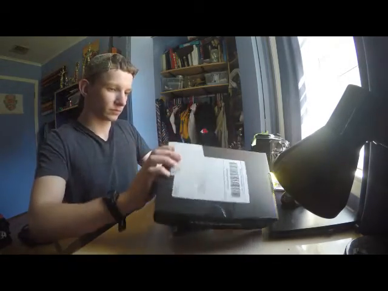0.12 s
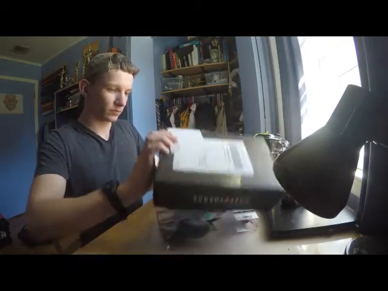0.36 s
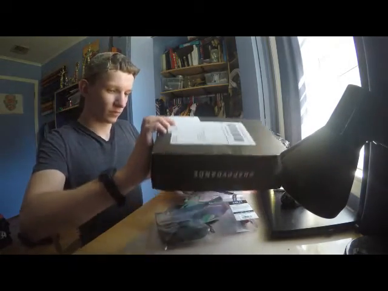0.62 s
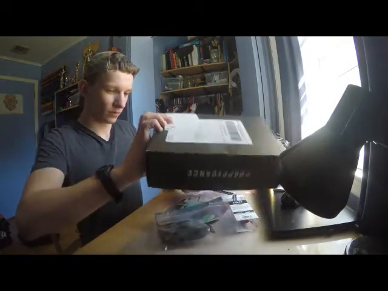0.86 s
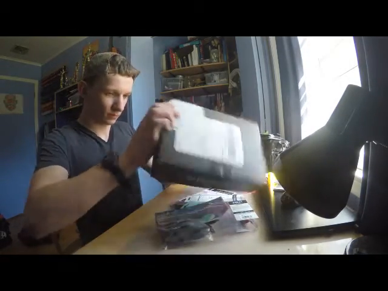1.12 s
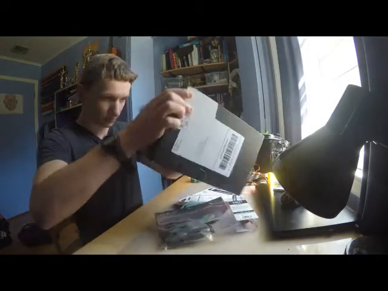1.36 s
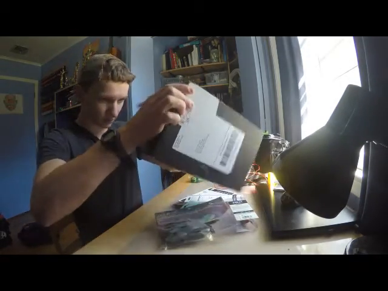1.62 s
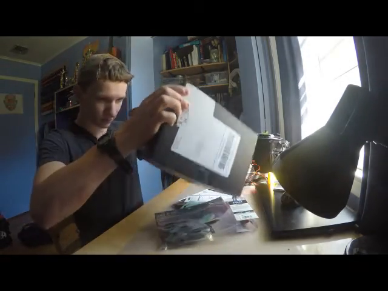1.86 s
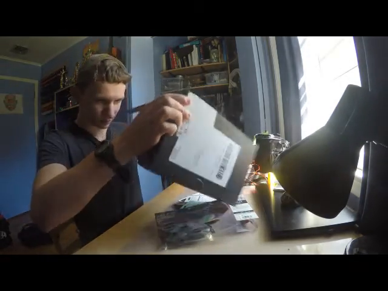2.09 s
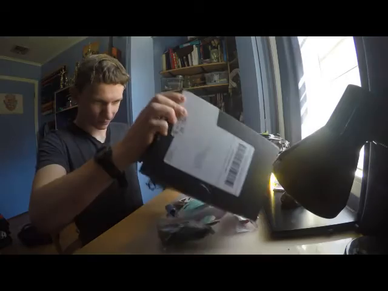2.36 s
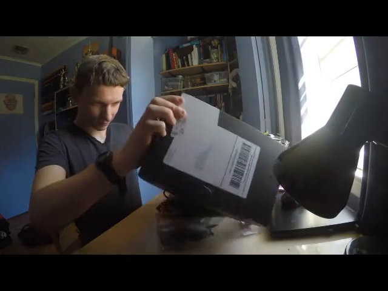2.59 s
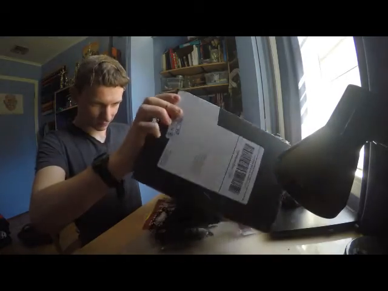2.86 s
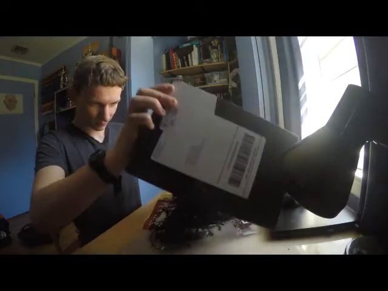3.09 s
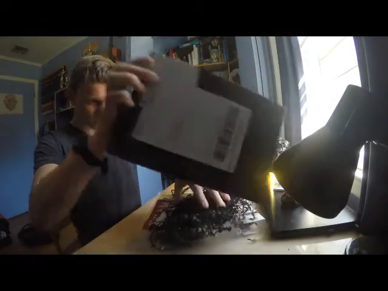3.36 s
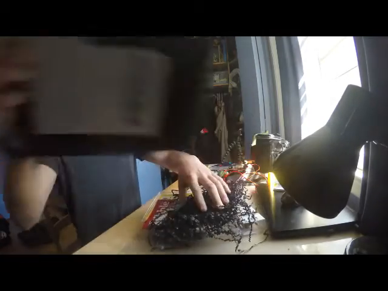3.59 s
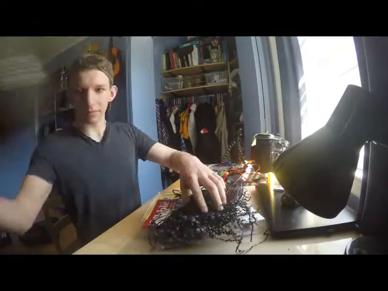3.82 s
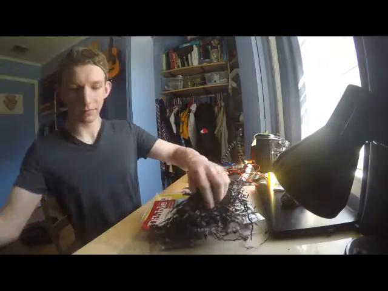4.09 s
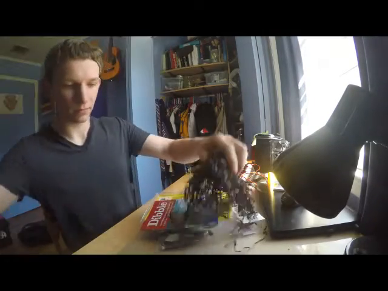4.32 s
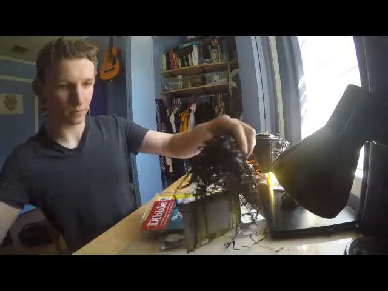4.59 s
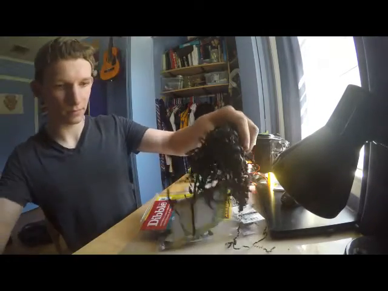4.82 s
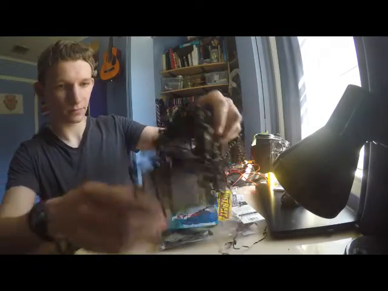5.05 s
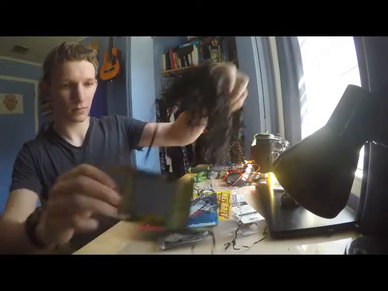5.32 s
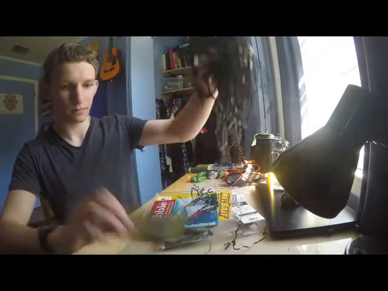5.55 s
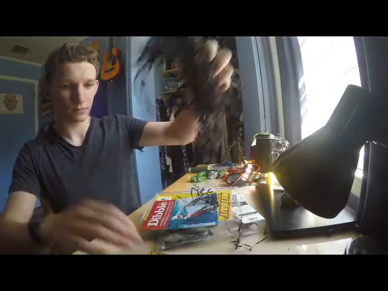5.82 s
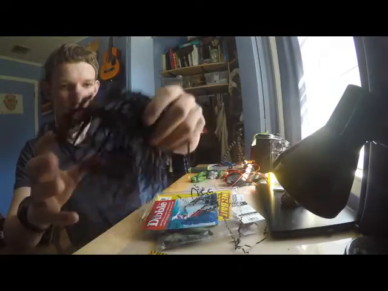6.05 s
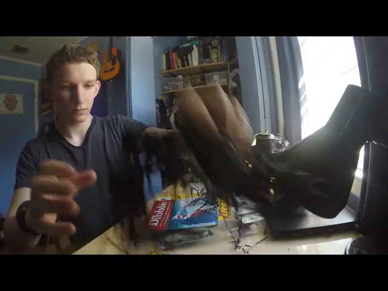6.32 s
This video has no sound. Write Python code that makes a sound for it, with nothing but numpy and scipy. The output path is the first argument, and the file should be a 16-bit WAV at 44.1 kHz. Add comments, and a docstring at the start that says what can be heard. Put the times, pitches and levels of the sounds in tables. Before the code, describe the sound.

Close, boomy desk sounds picked up through the wood: a cluster of knocks with crinkling packets, one isolated knock, small ticks and rubbing, then another strong thump as more contents drop. Shredded paper rustles softly and things go nearly quiet. A tossed empty cardboard box cracks sharply onto the floor and bounces with a hollow clatter. A few deep thuds and short skids on the desk follow, over faint hiss.

```python
"""Packets knock on a wooden desk top that booms and rings, card and shredded paper slide and rustle
between the knocks, and an empty box lands on the floor a few steps away and bounces.
A cardboard box is being tipped out; the microphone is in a small camera standing on the desk. The desk is
a set of dying sines, struck for blows and fed with noise or clicks for pushes and friction. The landing
rings box and floor and crackles card. A short room tail, the camera case and faint hiss lie over it all."""
import sys
import numpy as np
from scipy import signal
from scipy.fft import rfft, irfft
from scipy.io import wavfile
from scipy.ndimage import uniform_filter1d

SR = 44100
rng = np.random.default_rng(int(sys.argv[2]) if len(sys.argv) > 2 else 0)


def magnitude_from_level(level_db):
    """Linear magnitude for a level in decibels (20 dB per decade)."""
    exponent = np.asarray(level_db, float) / 20
    return 10 ** exponent


def output_pcm(signal):
    """Save a mono or channel-first signal as 16-bit PCM at the path in sys.argv[1].

    Samples are clipped to [-1, 1] before scaling.
    """
    pcm = np.clip(np.atleast_2d(signal).T, -1, 1) * 32767
    wavfile.write(sys.argv[1], SR, np.round(pcm).astype(np.int16))


N = 283563  # length of the scene in samples


def evened(x):
    """Scales to rms 1."""
    return x / np.sqrt(np.mean(x ** 2) + 1e-20)


def loudest(x):
    """Scales so that the loudest 10 ms have rms 1."""
    power = uniform_filter1d(x ** 2, SR // 100)
    return x / np.sqrt(power.max() + 1e-20)


def peaked(x):
    """Scales to a peak of 1."""
    return x / (abs(x).max() + 1e-20)


def add(mix, start_s, sound):
    """Lays a sound into the mix at start_s seconds."""
    part = mix[round(start_s * SR):][:len(sound)]
    part += sound[:len(part)]


def coloured(x, points):
    """Filters x by a spectrum of (Hz, dB) points."""
    hz, db = np.transpose(points)
    bins_hz = np.fft.rfftfreq(len(x), 1 / SR)
    gain = magnitude_from_level(np.interp(np.log(bins_hz + 1), np.log(hz), db))
    return irfft(rfft(x) * gain, len(x))


def swell(count, rise_s):
    """The smooth start of a blow; rise_s is its time constant."""
    return (1 - np.exp(-np.arange(count) / SR / rise_s)) ** 2


def ring(modes, seconds, spread_db=0.):
    """Dying sines of neighbouring modes, which start in opposite directions."""
    t = np.arange(round(seconds * SR)) / SR
    hz, db, t60 = np.transpose(modes)[:, :, None]
    luck = rng.standard_normal((len(modes), 1))
    sign = (-1.) ** np.arange(len(modes))[:, None]
    decay = magnitude_from_level(db + spread_db * luck - 60 * t / t60)
    return (sign * decay * np.sin(2 * np.pi * hz * t)).sum(0)


def crackle(count, per_s, spread_db):
    """Clicks of random sign in bunches over count samples; a few are large."""
    draw = rng.random((3, count))
    bunches = magnitude_from_level(2. * evened(uniform_filter1d(rng.standard_normal(count), 400)))
    size_db = -spread_db * np.log(np.maximum(draw[0], .02))
    sign = np.sign(draw[1] - .5)
    happens = draw[2] < per_s / SR
    return bunches * magnitude_from_level(size_db) * sign * happens


# modes of the desk top and the camera standing on it: pitch_hz, level_db, t60_s
DESK_MODES = [(45.4, -7.5, .2), (64, 7.5, 0.23), (77, -1.5, 0.35), (93.2, 0.5, 0.46), (120.1, -3.5, 0.2),
              (157.4, 1.5, 0.14), (203.5, -6, 0.27), (248.5, -6, 0.13), (298, -8, 0.097), (342, -5, 0.13),
              (484.9, -4.5, 0.11), (620.5, -3, 0.039), (702.2, 0.5, .05), (750.5, 1.5, 0.033),
              (830.5, -8, 0.04), (988, -13, 0.033), (1147, -2, 0.022), (1339, -4.5, 0.023),
              (1622, -1.5, 0.018), (1828, 3, 0.029), (2127, 3.5, 0.022), (2330, -7.5, 0.034),
              (2536, -5.5, 0.017), (2740, -8.5, 0.029), (3150, -7, 0.0091), (3421, 2.5, .025),
              (3393, 2.5, 0.014), (4076, -3, 0.0083), (3927, 3, 0.014)]
# registers of the desk by name: low_hz, high_hz
REGISTERS = {"deep": (0, 72), "boom": (72, 135), "thud": (135, 530), "knock": (530, 1050),
             "clack": (1050, 2600), "snap": (2600, 5000)}


def desk_ring(register, spread_db=0.):
    """The desk modes of one register after a sharp tap."""
    low_hz, high_hz = REGISTERS[register]
    modes = [mode for mode in DESK_MODES if low_hz < mode[0] < high_hz]
    longest_s = max(t60 for *_, t60 in modes)
    return ring(modes, 1.5 * longest_s, spread_db)


# tick of hard contact: pitch_hz, level_db (per Hz)
TICK = [(1650, -41), (2800, -5.5), (4130, -13), (5180, -18.5), (7330, -18), (9700, -35.5), (10600, -26.5),
        (12000, -45.5), (15600, -74.5), (22000, -120)]
# hard knocks on the desk: start_s, snap_db, boom_db, knock_db, clack_db
KNOCKS = [(0.0243, -37.5, -27, -23, -35.5), (0.0617, -50, -33, -26, -34), (0.1656, -48, -56, -44, -70),
          (0.2403, -42.5, -20.5, -9.5, -21.5), (0.2709, -33, -22, -19.5, -24.5),
          (0.304, -46, -47.5, -43, -39), (0.3124, -40, -35, -49, -42), (0.406, -45, -35, -43.5, -48.5),
          (0.443, -39, -41.5, -54, -54), (0.5415, -47, -47, -59, -62.5), (0.6305, -52, -53.5, -67, -60),
          (0.815, -31.5, -27.5, -9.5, -20), (0.9358, -57.5, -41.5, -68, -65),
          (0.95, -50, -51.5, -56.5, -53.5), (1.0945, -45, -65, -64.5, -57.5),
          (1.261, -49.5, -53.5, -73, -59), (1.3659, -51, -54.5, -55, -55.5),
          (1.617, -45, -56.5, -57, -46.5), (1.7628, -53, -66.5, -71.5, -58.5),
          (1.8193, -48, -62, -67, -61.5), (2.261, -24, -11.5, -6.5, -23), (2.3182, -55.5, -26.5, -35, -53),
          (2.3316, -41, -34.5, -55, -67), (2.5659, -47, -28.5, -25.5, -40.5), (2.6428, -46, -40, -49, -67),
          (2.728, -48, -56.5, -75, -68), (2.858, -49, -57.5, -66, -68), (3.0875, -46.5, -35.5, -68, -55),
          (3.109, -54, -31.5, -57.5, -49), (3.8744, -52, -62, -61, -79), (4.1982, -60, -50.5, -55.5, -61),
          (4.2694, -66, -51.5, -66, -75.5), (5.1256, -44, -51, -70.5, -58),
          (5.2031, -48, -59.5, -78.5, -72.5), (5.391, -41, -32, -38, -34.5), (5.657, -27.5, -21, -35, -63),
          (5.7454, -51.5, -24, -26, -30.5), (6.264, -56, -66, -67, -51.5)]


def knock(snap_db, boom_db, knock_db, clack_db):
    """A blow ticks and rings the desk from boom to snap; low modes take longer to build up."""
    out = np.zeros(SR)
    count = SR // 8
    tick = coloured(rng.standard_normal(count), TICK)
    snap = tick * magnitude_from_level(-60 * np.arange(count) / SR / 0.067)  # t60 67 ms
    add(snap, 0, 1.3 * abs(snap).max() * peaked(desk_ring("snap", 4))[:count])
    add(out, 0, magnitude_from_level(snap_db) * peaked(snap * swell(count, 0.000993)))
    thud_db = boom_db - 9
    layers = (("boom", boom_db, .005), ("thud", thud_db, .003),
              ("knock", knock_db, .0012), ("clack", clack_db, .001))
    for register, level_db, rise_s in layers:
        modes = desk_ring(register, spread_db=2.5)
        struck = modes[:SR] * swell(len(modes), rise_s)[:SR]
        add(out, 0, magnitude_from_level(level_db) * loudest(struck))
    return out


# paper heard directly: pitch_hz, level_db (per Hz)
PAPER = [(530, -32), (900, -2), (2120, -5), (3000, 0), (3970, -3.5), (5270, -15.5), (7950, -16.5),
         (12000, -33.5), (15600, -65), (22000, -120)]


def rubbed(clicks, register, airborne, spread_db=0.):
    """Friction clicks ring one register of the desk; a share is heard directly as paper."""
    wood = signal.oaconvolve(clicks, desk_ring(register, spread_db))[:len(clicks)]
    return loudest(wood) + airborne * loudest(coloured(clicks, PAPER))


# soft packets flop and skid on the desk: start_s, crinkle_db, clack_db, knock_db, contact_s
SKIDS = [(.012, -52.5, -58, -42, 0.076), (.27, -46.5, -45, -35, 0.085), (.455, -57.5, -55.5, -52.5, 0.048),
         (.63, -67.5, -62.5, -67, 0.044), (.735, -65, -58, -69, .035), (.95, -57.5, -59, -61, 0.12),
         (1.144, -53.5, -52, -47.5, 0.085), (1.35, -62.5, -62.5, -67.5, 0.12),
         (1.617, -48, -53.5, -52, 0.055), (2.008, -55.5, -55, -61, .14), (2.455, -61, -51, -64, 0.28),
         (2.575, -51.5, -57.5, -43.5, 0.11), (2.75, -64.5, -73.5, -57, 0.084),
         (3.087, -65, -48.5, -49, 0.037), (3.235, -76, -71.5, -60, .04), (3.42, -70.5, -86, -87, 0.13),
         (3.8, -66, -76.5, -73, .07), (3.876, -66.5, -78.5, -61, 0.074), (4.196, -71, -67, -58, 0.035),
         (4.27, -78.5, -70, -67.5, 0.077), (5.12, -62, -72, -83, 0.18), (5.366, -70, -48.5, -38, 0.019),
         (5.385, -49, -39, -40, 0.075), (5.483, -65, -47.5, -43, 0.1), (5.65, -62, -35, -29.5, 0.02),
         (5.708, -53, -39.5, -34, 0.034), (5.742, -53, -34.5, -29.5, 0.037),
         (5.785, -59, -47.5, -45.5, 0.045), (5.85, -75, -67, -54, 0.059)]


def skid(crinkle_db, clack_db, knock_db, contact_s):
    """Contact starts at once, holds, and fades; meanwhile dense clicks feed the desk."""
    t = np.arange(round(.45 * SR)) / SR - .01  # contact begins 10 ms in
    onset = np.clip(t / 0.0022, 0, 1)
    release = 1 + (np.maximum(t, 0) / contact_s) ** 7.7  # the power sets how abruptly contact ends
    grip = onset * np.exp(-.8 * t / contact_s) / release
    thud_db = (clack_db + knock_db) / 2 + 0.5
    layers = ((crinkle_db, "snap", 1.4), (clack_db, "clack", .5),
              (knock_db, "knock", .1), (thud_db, "thud", .01))
    out = np.zeros(len(t))
    for level_db, register, airborne in layers:
        clicks = grip * crackle(len(t), 1800, 4.)
        out += magnitude_from_level(level_db) * rubbed(clicks, register, airborne, 2)
    return out


# a hand or the box leans on the desk: start_s, thud_db, boom_db, deep_db
SHOVES = [(0.466, -49, -25, -47), (0.696, -68, -45.5, -59), (0.944, -54, -41, -48),
          (1.054, -52, -32.5, -56), (1.15, -43.5, -45, -61), (1.205, -45, -42.5, -59),
          (1.621, -58, -39.5, -51.5), (2.018, -60.5, -56, -58.5), (2.34, -43, -22, -41),
          (2.43, -54, -32, -54), (2.608, -43, -26, -34), (2.752, -58, -32.5, -62),
          (2.84, -63.5, -43, -58.5), (3.092, -46, -47.5, -32.5), (3.218, -56, -33.5, -40),
          (3.413, -78.5, -62, -44), (4.291, -66.5, -49.5, -58), (4.37, -72, -44, -60),
          (5.397, -38.5, -25, -46), (5.5, -53, -44, -43.5), (5.667, -34.5, -15.5, -22.5),
          (5.81, -40.5, -23.5, -53), (6.064, -70, -45.5, -63)]


def shove(thud_db, boom_db, deep_db):
    """A slow push reaches only the low modes."""
    out = np.zeros(SR)
    layers = (("thud", loudest, thud_db), ("boom", peaked, boom_db), ("deep", loudest, deep_db))
    for register, scaled, level_db in layers:
        modes = desk_ring(register, 2.4)[:SR]
        add(out, 0, magnitude_from_level(level_db) * scaled(modes * swell(len(modes), 0.0046)))
    return out


# hands, card and paper on the move: time_s, rustle_db, scrape_db, push_db (on the desk)
HANDLING = [(0.0, -59, -38, -24), (0.29, -55.5, -62, -53), (0.59, -69, -72, -61), (1.11, -64, -68.5, -50),
            (1.41, -64, -71.5, -59.5), (2.02, -60, -68.5, -66), (2.26, -60.5, -74, -62),
            (2.42, -59.5, -60.5, -50), (2.52, -54.5, -58, -40), (2.9, -72, -69.5, -58),
            (3.26, -74, -72, -52.5), (3.58, -74, -79, -70), (3.96, -66.5, -73, -70),
            (4.23, -71.5, -76, -70.5), (4.57, -68, -76, -43), (4.75, -74, -77.5, -51.5),
            (5.41, -68, -71.5, -66), (5.57, -58.5, -53.5, -55), (5.68, -62, -61.5, -52),
            (5.86, -74, -66.5, -37.5), (6.0, -77.5, -77.5, -56.5), (6.43, -72, -78, -68.5)]


def handling():
    """Paper crackles and rubs on the desk; uneven pushes keep the low modes alive."""
    time_s, *columns = np.transpose(HANDLING)
    t = np.arange(N) / SR
    rustle, scrape, push = (magnitude_from_level(np.interp(t, time_s, level_db)) for level_db in columns)
    rub = magnitude_from_level(-4.5) * np.sqrt(rustle * scrape)  # derived from both levels
    pushes = rng.standard_normal(N)
    boom, thud = (evened(signal.oaconvolve(pushes, desk_ring(register))[:N])
                  for register in ("boom", "thud"))
    out = push * (boom + 0.11 * thud)
    # hands move in fits: 2.5 dB of unevenness, smoothed over 81 ms
    drift = signal.oaconvolve(rng.standard_normal(N), np.hanning(round(0.081 * SR)), "same")
    fits = magnitude_from_level(2.5 * evened(drift))
    for level, register, airborne in ((rustle, "snap", 1.3), (rub, "clack", .5), (scrape, "knock", .1)):
        friction = rubbed(crackle(N, 2700, 2.9), register, airborne)
        out += level * evened(fits * friction)
    return out


# modes heard when the box lands: the shaken floor and desk at 40 Hz, five hollow box modes,
# then its panels: pitch_hz, level_db, t60_s
LANDING_MODES = [(40, -16, 0.35), (70.9, -11, 0.59), (147.7, 7, 0.23), (242.3, -9, 0.21), (658, -19, 0.14),
                 (741, -11.5, 0.08), (255, -11, 0.14), (289, -15.5, 0.32), (1022, -5.5, 0.057),
                 (1436, 10, 0.016), (1810, -7, 0.021), (2430, 4.5, 0.022)]
# crunch of creasing card: pitch_hz, level_db (per Hz)
CRUNCH = [(240, -33), (400, -9), (542, -7), (663, -24), (735, -10.5), (1400, -10.5), (2000, -17),
          (3200, -22), (4160, -41), (7040, -120)]
# loose flaps of the box: pitch_hz, level_db (per Hz)
FLAPS = [(880, -46), (1500, -27), (1830, -4.5), (2860, -12), (3140, -5.5), (3550, -9), (4040, -6.5),
         (5160, -20), (9740, -33.5), (10500, -36), (12000, -43), (15600, -76), (22000, -120)]
# the box lands on the floor: start_s, slap_db, hollow_db, crunch_db, rattle_db, t60_s (of crunch and rattle)
DROPS = [(4.471, -40, -55, -44, -52, 0.072), (4.478, -8.5, -23.5, -28.5, -32.5, 0.24),
         (4.527, -29, -58, -39, -39, 0.15), (4.561, -40, -25.5, -36, -27.5, 0.18),
         (4.831, -56, -54.5, -66, -84, 0.36), (4.949, -57, -24, -52.5, -59.5, 0.3)]


def drop(slap_db, hollow_db, crunch_db, rattle_db, t60):
    """Card slaps the floor: panels ring, creases and flaps crackle, box and shaken floor sound hollow."""
    count = round(.6 * SR)
    rise = swell(count, 0.00065)
    fade = rise * magnitude_from_level(-60 * np.arange(count) / SR / t60)
    crunch = loudest(coloured(crackle(count, 4000, 3.5), CRUNCH) * fade)
    rattle = loudest(coloured(crackle(count, 4000, 3.5), FLAPS) * fade)
    slap = peaked(ring(LANDING_MODES[6:], .6, 1) * rise)
    hollow = loudest(ring(LANDING_MODES[:6], .6, 1) * rise)
    ringing = magnitude_from_level(slap_db) * slap + magnitude_from_level(hollow_db) * hollow
    return ringing + magnitude_from_level(crunch_db) * crunch + magnitude_from_level(rattle_db) * rattle


# reverberation of the room: pitch_hz, t60_s
ROOM = [(100, 0.12), (1000, 0.092), (4000, 0.12), (10000, 0.04)]


def room(x):
    """A dense tail of reflections whose decay time depends on pitch, shortest at the top."""
    hz, t, noise = signal.stft(rng.standard_normal(SR // 2), SR, nperseg=256)
    room_hz, room_s = np.transpose(ROOM)
    t60 = np.interp(np.log(hz + 1), np.log(room_hz), room_s)
    tail = signal.istft(noise * magnitude_from_level(-60 * t / t60[:, None]), SR, nperseg=256)[1]
    tail = tail * (np.arange(len(tail)) > .004 * SR)  # no reflection in the first 4 ms
    airborne = signal.lfilter(*signal.butter(2, 300, "high", fs=SR), x)  # the boom stays in the wood
    return signal.oaconvolve(airborne, tail / np.linalg.norm(tail))[:N]


# resonances of the camera case: pitch_hz, width_hz, level_db
CASE = [(2150, 300, -17.5), (3580, 150, -8), (3750, 55, -7)]


def camera_case(x):
    """The case around the microphone resonates along with what reaches it."""
    out = x.copy()
    for hz, width_hz, level_db in CASE:
        out += magnitude_from_level(level_db) * signal.lfilter(*signal.iirpeak(hz, hz / width_hz, SR), x)
    return out


# background hiss, strongest at the very bottom: pitch_hz, level_db (per Hz)
HISS = [(12, -31), (20, 0), (44, -18), (88, -17.5), (182, -32.5), (213, -29.5), (407, -35), (547, -40),
        (2540, -42), (3060, -43), (3600, -41), (11400, -49), (12400, -60), (16100, -89), (22000, -120)]


def hiss():
    """Steady coloured noise, at -56 dB rms before the band limit."""
    return magnitude_from_level(-56) * evened(coloured(rng.standard_normal(N), HISS))


def scene():
    """Knocks, skids, shoves, drops and handling, with the room 16 dB down behind them."""
    near = handling()
    # each sound is laid in a little ahead of its start_s
    events = ((KNOCKS, knock, .002), (SKIDS, skid, .01), (SHOVES, shove, .008), (DROPS, drop, .002))
    for table, sound, lead_s in events:
        for start_s, *settings in table:
            add(near, start_s - lead_s, sound(*settings))
    return (near + magnitude_from_level(-16) * room(near))[None]


def band_limit(x):
    """A steep low-pass at the top of the band."""
    return signal.sosfilt(signal.butter(12, 12640, fs=SR, output="sos"), x)


def record(dry):
    """The case resonates, the loudest peaks are rounded off, hiss joins, the treble is cut off."""
    case = camera_case(dry[0])
    rounded = case / (1 + (case / .96) ** 10) ** (1 / 10)  # peaks stay below 0.96
    low_pass = signal.cheby1(12, .5, 12300, fs=SR, output="sos")
    band = signal.sosfilt(low_pass, rounded + hiss())
    return band_limit(band[None])


dry = scene()
out = record(dry)
output_pcm(out)
```